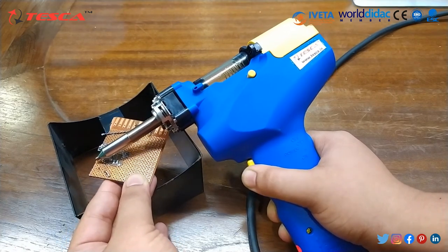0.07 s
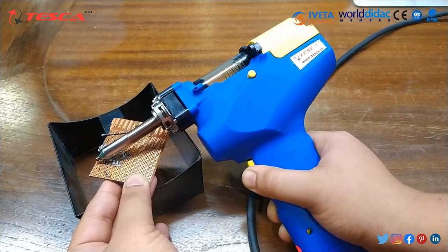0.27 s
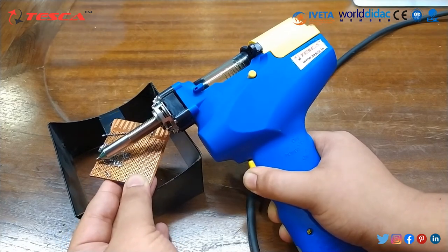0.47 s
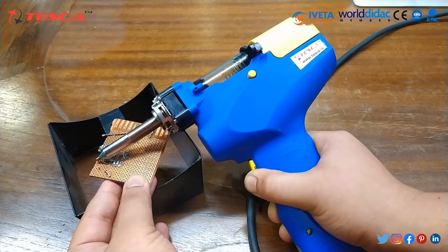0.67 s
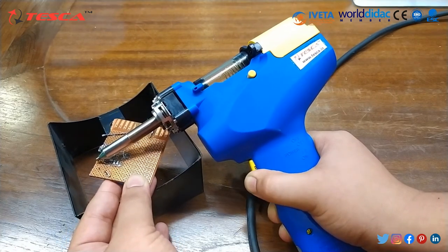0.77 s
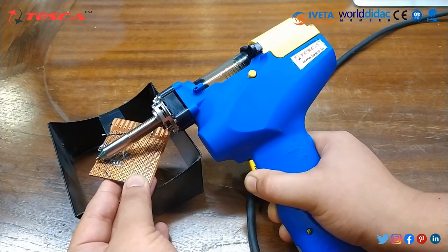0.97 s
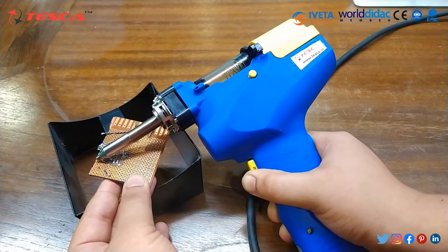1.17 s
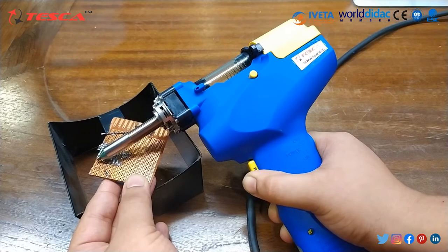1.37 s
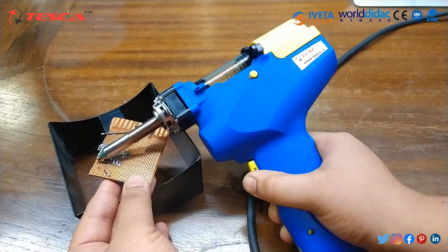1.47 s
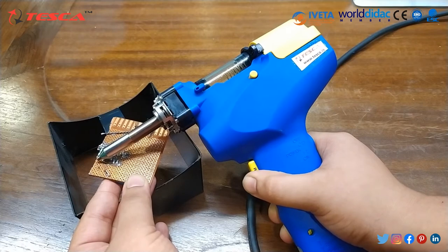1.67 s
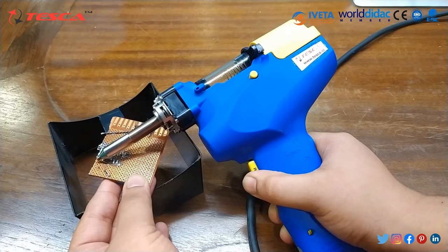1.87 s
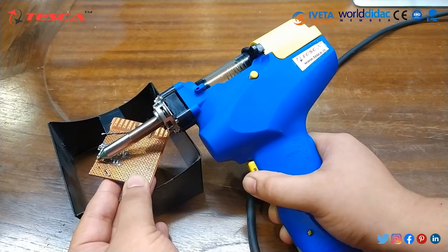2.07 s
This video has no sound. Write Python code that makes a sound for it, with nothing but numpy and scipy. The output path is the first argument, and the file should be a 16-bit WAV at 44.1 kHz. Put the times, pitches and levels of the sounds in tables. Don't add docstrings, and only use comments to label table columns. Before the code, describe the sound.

After quiet low room hum, a handheld desoldering pump bursts into a hard plastic rattling buzz, quickly winds down, and rings away in a reverberant room; close microphone then picks up deep wobbling handling thuds.

```python
import sys
import numpy as np
from scipy import signal
from scipy.fft import rfft, irfft
from scipy.io import wavfile

SR = 44100
rng = np.random.default_rng(int(sys.argv[2]) if len(sys.argv) > 2 else 0)


def master_out(mix):
    frames = np.transpose(np.atleast_2d(mix))
    ceiling = np.clip(frames, -1, 1)
    pcm = np.round(ceiling * 32767).astype(np.int16)
    wavfile.write(sys.argv[1], SR, pcm)


def makeup_ratio(level_db):
    decades = np.asarray(level_db, float) / 20
    return 10 ** decades


N = 93624
STROKES = np.arange(0, 34)
PUFF_POWER = 0.6


def at_hz(points, hz):
    table = np.array(points)
    return np.interp(np.log(hz + 1e-9), np.log(table[:, 0]), table[:, 1])


def rms_one(x):
    return x / np.sqrt(np.mean(x ** 2) + 1e-20)


def coloured(points):
    hz = np.fft.rfftfreq(N, 1 / SR)
    gain = makeup_ratio(at_hz(points, hz)) * (hz > points[0][0] * 0.5)
    return rms_one(irfft(rfft(rng.standard_normal(N)) * gain, N))


def ring(clicks, hz, t60):
    r = makeup_ratio(-60 / (t60 * SR))
    w = 2 * np.pi * hz / SR
    return signal.lfilter([0, np.sin(w)], [1, -2 * r * np.cos(w), r * r], clicks + 1e-18)


def band(x, low_hz, high_hz):
    return signal.sosfilt(signal.butter(2, [low_hz, high_hz], "band", fs=SR, output="sos"), x)


def high_pass(x, low_hz):
    return signal.sosfilt(signal.butter(1, low_hz, "high", fs=SR, output="sos"), x)


def gun():
    # pitch in Hz, level in dB, t60 in seconds.
    thump_modes = [(660, -5, .03), (338, -19, .05), (424, -26, .04), (850, -22, .025), (1020, -20, .05)]
    # pitch in Hz, level in dB, t60 in seconds.
    slap_modes = [(517, -19, 0.01), (780, -9.5, 0.021), (920, -6.5, 0.014), (1216, -17, 0.033),
                  (1583, -26, 0.033), (1853, -27.5, 0.11), (1930, -34, 0.08)]
    # multiple of the turning speed, level in dB.
    shake = [
        (1, -29),
        (2, -27.5),
    ]
    notch_hz, notch_width_hz = 250.5, 31.4
    desk_echo_s, desk_echo_db = 0.0034, -20

    turns, force = motor()
    shell = knocks(turns, force ** 0.96, -0.2489, thump_modes, soft_hz=800)
    shell = shell + knocks(turns, force, 0.0063, slap_modes, soft_hz=1900)
    shell = signal.lfilter(*signal.iirnotch(notch_hz, notch_hz / notch_width_hz, fs=SR), shell)
    shell = high_pass(shell, 260)

    tool = shell + reed(turns, force) + puffs(turns, force) + trigger()
    n = np.arange(N)
    tool = tool + makeup_ratio(desk_echo_db) * np.interp(n - desk_echo_s * SR, n, tool)
    return tool + force * sum(makeup_ratio(db) * np.sin(2 * np.pi * int(k) * turns) for k, db in shake)


def motor():
    start_s, release_s, stall_s = 0.672, 1.0134, 1.095
    top_hz, first_turn = 85.157, -0.589
    quick_share, quick_s, slow_s, coast_s = 0.9256, 0.0246, 0.0817, 0.1046
    force_power, coast_fade_db_per_s = 1.5, 25.0

    t = np.arange(N) / SR
    on = np.maximum(t - start_s, 0)
    off = np.maximum(t - release_s, 0)
    spin_up = 1 - quick_share * np.exp(-on / quick_s) - (1 - quick_share) * np.exp(-on / slow_s)
    speed = spin_up * np.exp(-off / coast_s)
    still_moving = np.clip((stall_s - t) * 50, 0, 1)
    force = speed ** force_power * makeup_ratio(-coast_fade_db_per_s * off) * still_moving
    return first_turn + np.cumsum(speed) * top_hz / SR, force


def moments(turns, strokes, place, scatter):
    wanted = strokes + place + scatter * rng.standard_normal(len(strokes))
    return np.searchsorted(turns, wanted).clip(0, N - 1)


def knocks(turns, force, place, modes, soft_hz):
    jitter_turn, spread_db = 0.0036, 3
    at = moments(turns, STROKES, place, jitter_turn)
    out = 0
    for hz, level_db, t60 in modes:
        clicks = np.zeros(N)
        clicks[at] = -force[at] * makeup_ratio(level_db + spread_db * rng.standard_normal(len(at)))
        out = out + ring(clicks, hz, t60)
    r = np.exp(-2 * np.pi * soft_hz / SR)
    return signal.lfilter([(1 - r) ** 2], [1, -2 * r, r * r], out)


def puffs(turns, force):
    # pitch in Hz, level in dB per Hz.
    air_spectrum = [(1530, -34), (2600, -6), (6150, -1.5), (7100, -3.5), (8080, 4), (9050, -1), (15800, -7)]
    # pitch in Hz, width in Hz, level in dB.
    nozzle = [(6420, 290, 0), (7900, 180, -0.5), (8300, 300, -11), (10400, 230, -4.5), (11500, 340, -19),
              (15800, 600, 2)]
    puff_turn, puff_db, sharpness, spread_db = 0.037, -36, 3.2, 1.2
    leak_share, leak_power = 0.4, 1.8
    rattle_db, rattle_power = -40, 0.6

    stroke_db = spread_db * rng.standard_normal(40)[np.round(turns).astype(int)]
    burst = makeup_ratio(stroke_db) * np.exp(sharpness * (np.cos(2 * np.pi * (turns - puff_turn)) - 1))
    leak = force ** leak_power * leak_share
    air = coloured(air_spectrum) * (leak + force ** PUFF_POWER * burst * (turns > -0.5))
    hiss = air.copy()
    for hz, width, level_db in nozzle:
        hiss += makeup_ratio(level_db) * signal.lfilter(*signal.iirpeak(hz, hz / width, fs=SR), air)
    rattle = rms_one(band(rng.standard_normal(N), 480, 2130)) * force ** rattle_power
    return makeup_ratio(puff_db) * hiss + makeup_ratio(rattle_db) * rattle


def reed(turns, force):
    # pitch in Hz, level in dB, t60 in seconds.
    reed_modes = [(7840, -34.5, .006), (8700, -46, 0.0063), (9800, -62, 0.003)]
    place, scatter, spread_db = 0.05, 0.09, -7
    at = moments(turns, np.repeat(STROKES, 2), place, scatter)
    clicks = np.zeros(N)
    clicks[at] = force[at] ** PUFF_POWER * makeup_ratio(spread_db * rng.standard_normal(len(at)))
    return sum(makeup_ratio(db) * ring(clicks, hz, t60) for hz, db, t60 in reed_modes)


def trigger():
    # start in seconds, level in dB, decay in seconds.
    ticks = [
        (.6715, -37, .0035),
        (1.022, -38, .002),
    ]
    t = np.arange(N) / SR
    shape = 0
    for start, db, decay in ticks:
        shape = shape + makeup_ratio(db) * (t > start) * np.exp(-np.maximum(t - start, 0) / decay)
    return shape * rms_one(band(rng.standard_normal(N), 2200, 9000))


def stand():
    # time in seconds, signed step of pressure.
    rocking = [(1.44, 0.054), (1.47, 0.27), (1.51, -0.52), (1.558, -0.23), (1.591, 0.74), (1.67, -.62),
               (1.746, 0.55), (1.825, -0.4), (1.857, 0.27), (1.885, -.12), (1.9, 0.29), (1.937, -0.16),
               (1.982, -0.24), (2.013, 0.18), (2.039, -0.037), (2.056, 0.078), (2.091, -0.047),
               (2.114, 0.11)]
    # time in seconds, level in dB.
    judder = [
        (1.44, -85.5),
        (1.49, -34.5),
        (1.58, -25),
        (1.67, -27),
        (1.76, -36.5),
        (2.0, -44.5),
        (2.12, -47),
    ]
    edge_s, leak_hz = 0.018, 3.07
    low_hz, high_hz = 23.1, 80

    t = np.arange(N) / SR
    steps = sum(size * (1 + np.tanh(2 * (t - s) / edge_s)) * 0.5 for s, size in rocking)
    swing = high_pass(steps, leak_hz)
    shiver = band(band(rng.standard_normal(N), low_hz, high_hz), low_hz, high_hz)
    return swing + rms_one(shiver) * makeup_ratio(np.interp(t, *np.transpose(judder)))


def noise_band(low_hz, high_hz):
    return band(band(rng.standard_normal(SR), low_hz, high_hz), low_hz, high_hz)


def room(x):
    # pitch in Hz, t60 in seconds.
    room_t60 = [(100, 0.84), (700, 1.02), (2100, 1.33), (3000, 1.13), (8000, 0.72), (15000, 0.48)]
    # pitch in Hz, level in dB.
    room_colour = [(100, 8), (250, 3), (380, -6.5), (700, -4), (1500, 3.5), (2700, 0.5), (8500, 6.5),
                   (15000, 9)]
    # low edge in Hz, high edge in Hz, level in dB, t60 in seconds.
    favoured = (2002, 2295, 15.7, 0.94)
    # pitch in Hz, level in dB, t60 in seconds.
    room_modes = [(678, -70, .9), (1017, -70, .9)]
    room_db, delay_s, build_s = -9, 0.018, 0.028

    t = np.arange(SR) / SR
    tail = 0
    edges = 60 * 2 ** np.arange(0, 8.3, 0.25)
    for low, high in zip(edges, edges[1:]):
        hz = np.sqrt(low * high)
        fall_db = at_hz(room_colour, hz) - 60 * t / max(at_hz(room_t60, hz), 0.05)
        tail = tail + noise_band(low, high) * makeup_ratio(fall_db)
    low, high, level_db, t60 = favoured
    tail = tail + noise_band(low, high) * makeup_ratio(level_db - 60 * t / t60)
    tail = tail * np.clip((t - delay_s) / build_s, 0, 1) / np.sqrt(SR / 14)
    lasting = sum(makeup_ratio(db) * ring(x, hz, t60) for hz, db, t60 in room_modes)
    return makeup_ratio(room_db) * signal.fftconvolve(x, tail)[:N] + lasting


def room_tone():
    # pitch in Hz, level in dB per Hz.
    air = [(8.8, -65), (15, 7.5), (44, -20.5), (106, -6.5), (168, -14.5), (206, -15), (246, -18.5),
           (494, -21), (15800, -67)]
    return makeup_ratio(-41.5) * coloured(air)


def scene():
    tool = gun()
    return (tool + room(tool) + room_tone() + stand())[None]


def band_limit(x):
    return signal.sosfilt(signal.butter(12, 15980, fs=SR, output="sos"), x)


def record(dry):
    top_cut = signal.cheby2(12, 60, 16100, fs=SR, output="sos")
    mix = signal.sosfilt(top_cut, dry)
    return band_limit(mix)


dry = scene()
out = record(dry)
master_out(out)
```